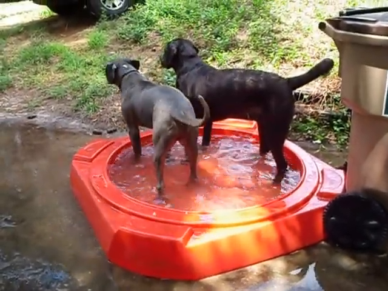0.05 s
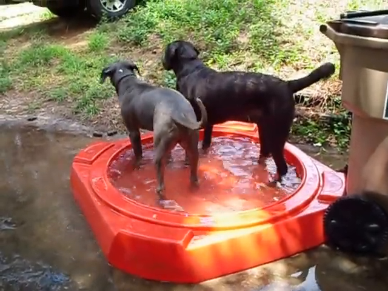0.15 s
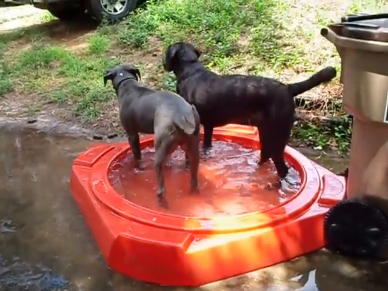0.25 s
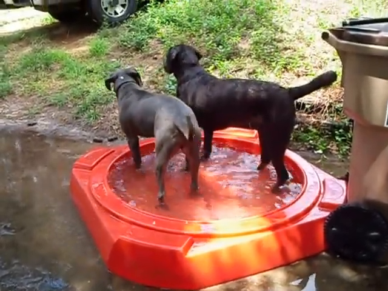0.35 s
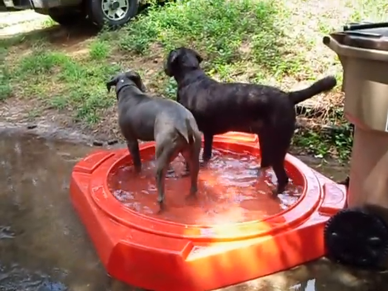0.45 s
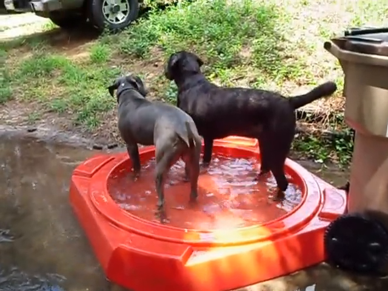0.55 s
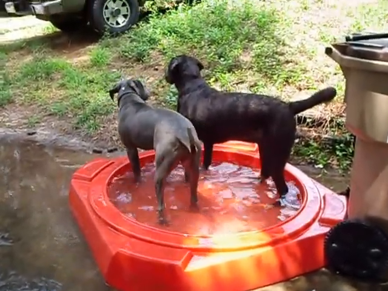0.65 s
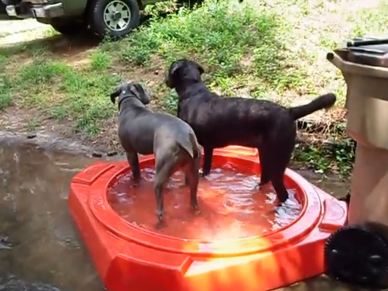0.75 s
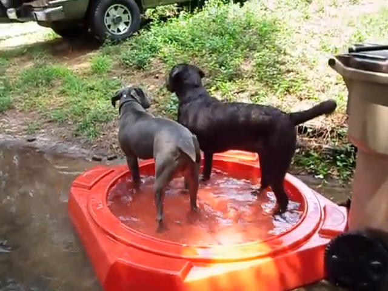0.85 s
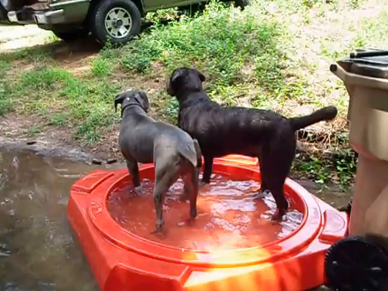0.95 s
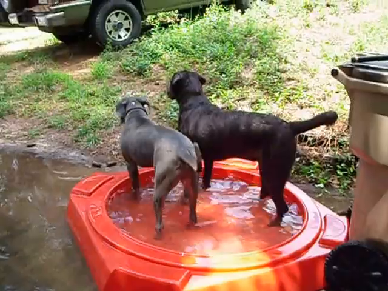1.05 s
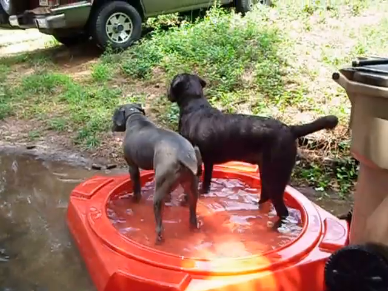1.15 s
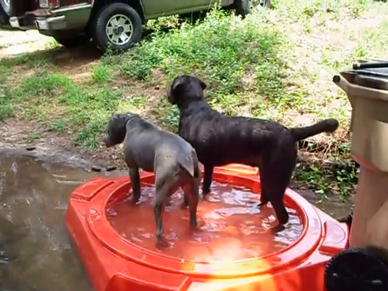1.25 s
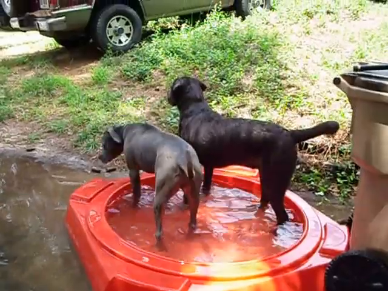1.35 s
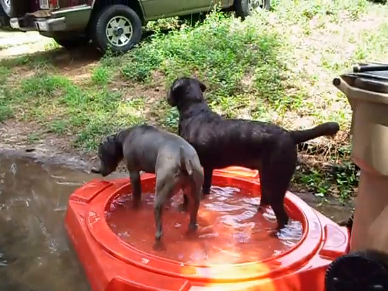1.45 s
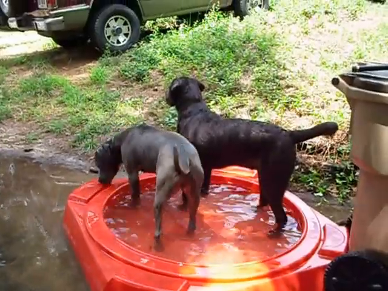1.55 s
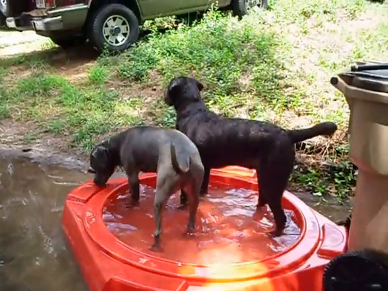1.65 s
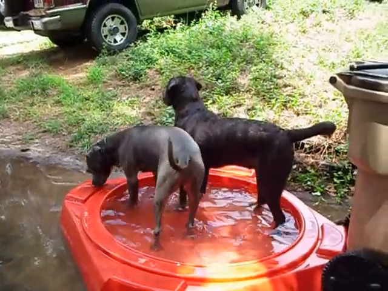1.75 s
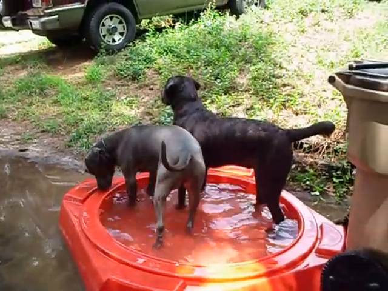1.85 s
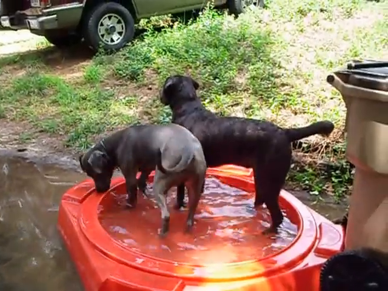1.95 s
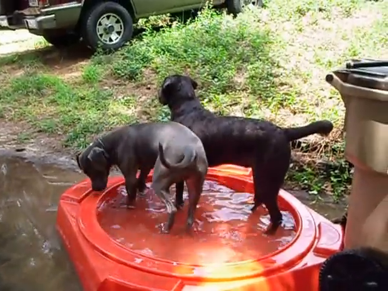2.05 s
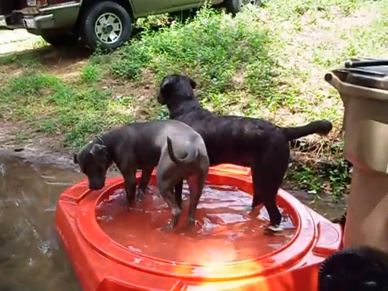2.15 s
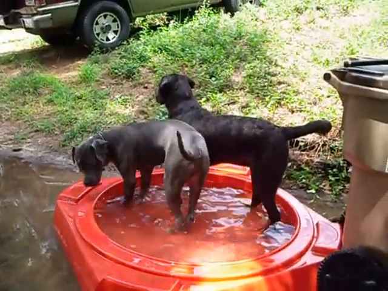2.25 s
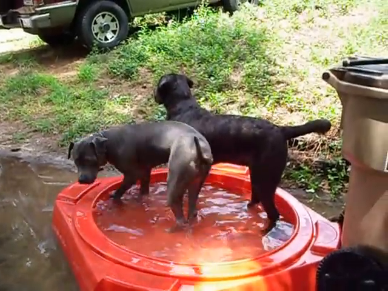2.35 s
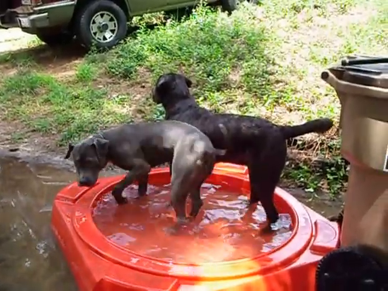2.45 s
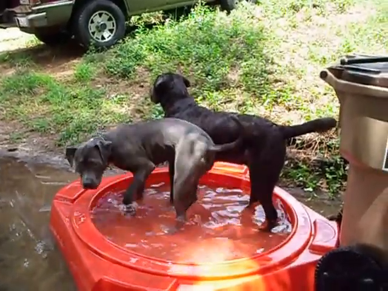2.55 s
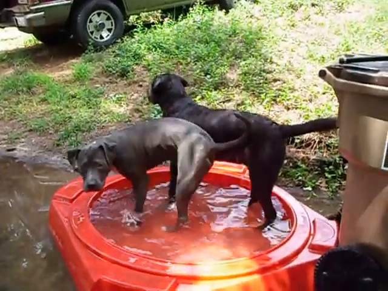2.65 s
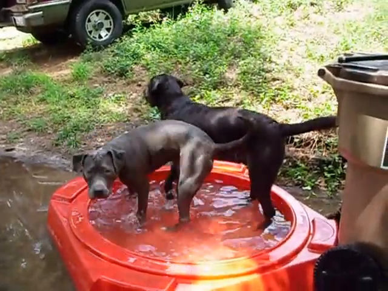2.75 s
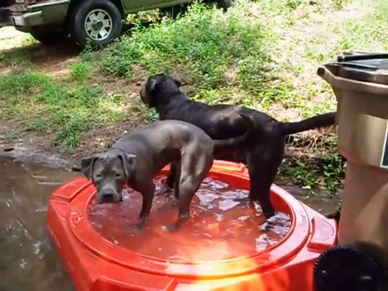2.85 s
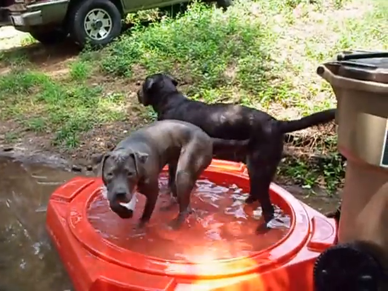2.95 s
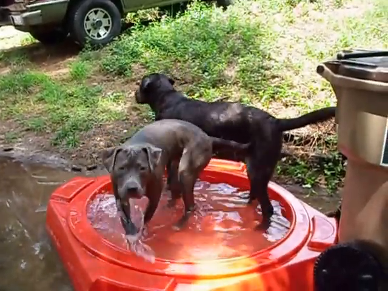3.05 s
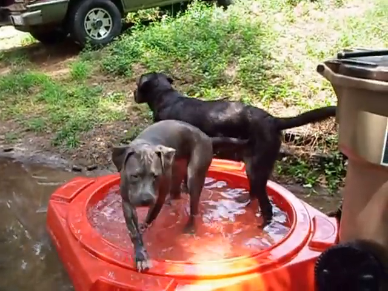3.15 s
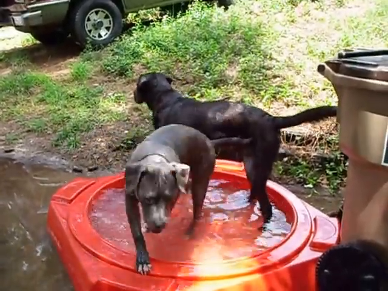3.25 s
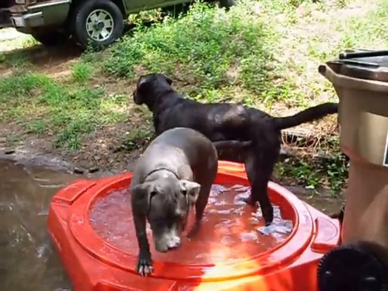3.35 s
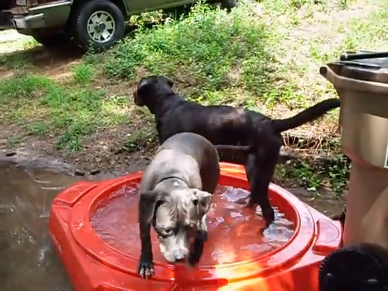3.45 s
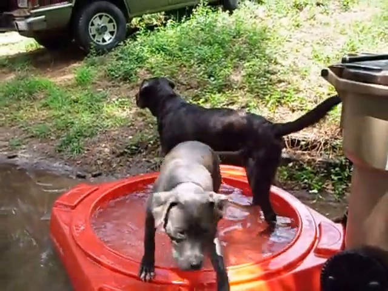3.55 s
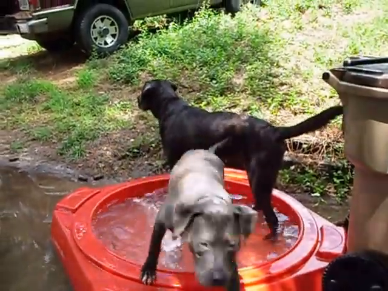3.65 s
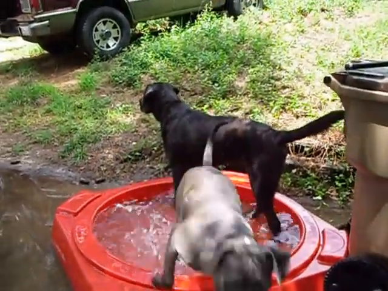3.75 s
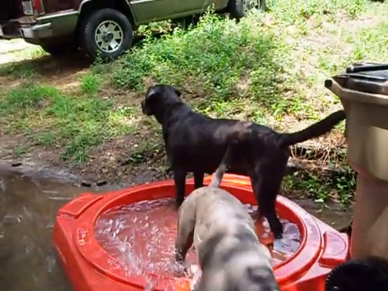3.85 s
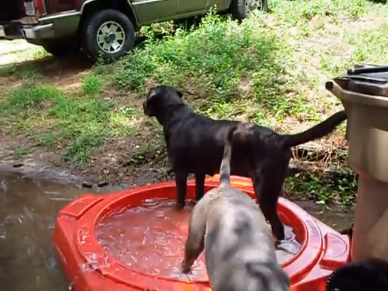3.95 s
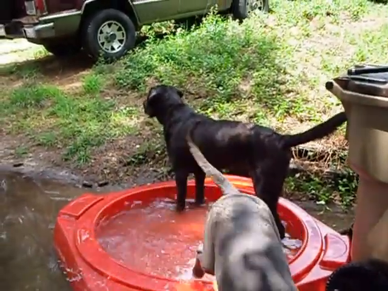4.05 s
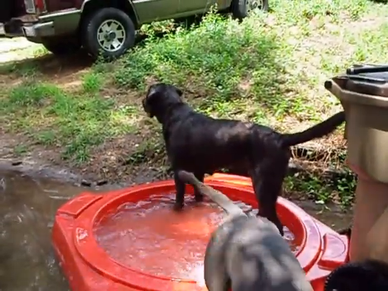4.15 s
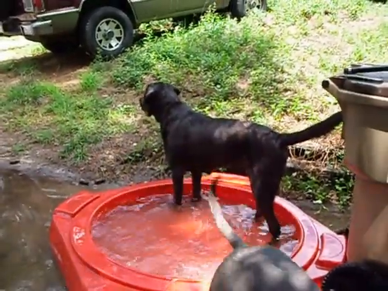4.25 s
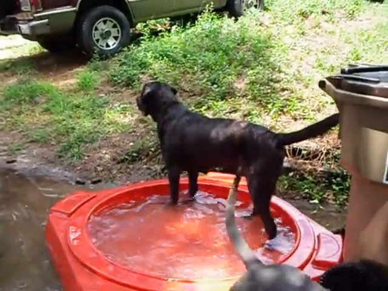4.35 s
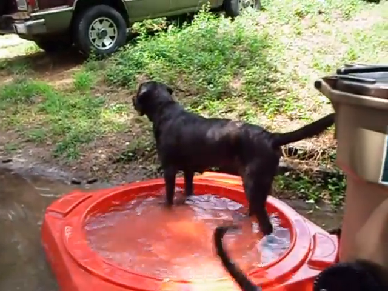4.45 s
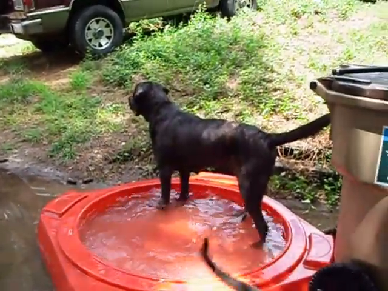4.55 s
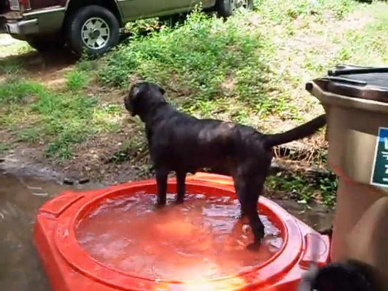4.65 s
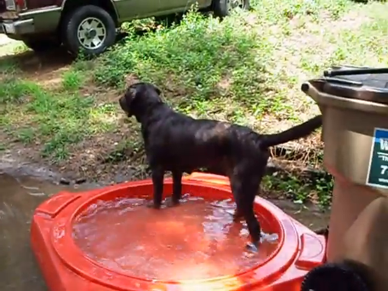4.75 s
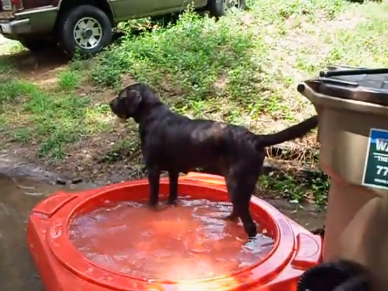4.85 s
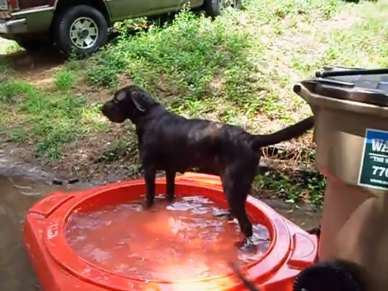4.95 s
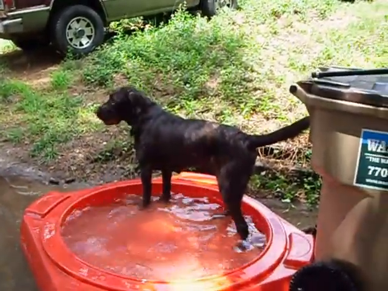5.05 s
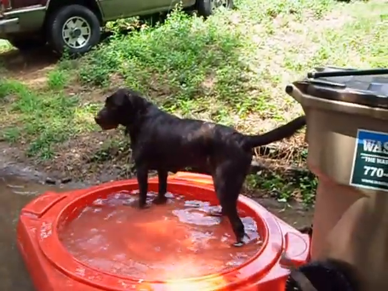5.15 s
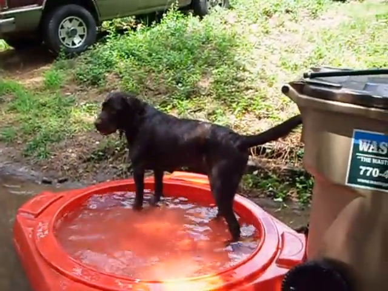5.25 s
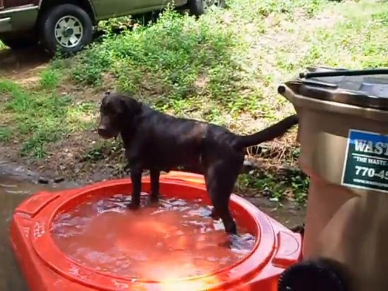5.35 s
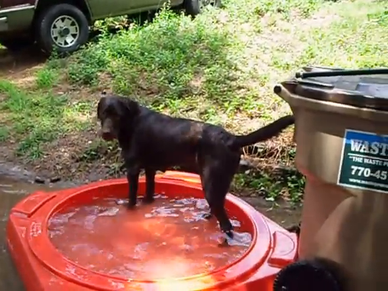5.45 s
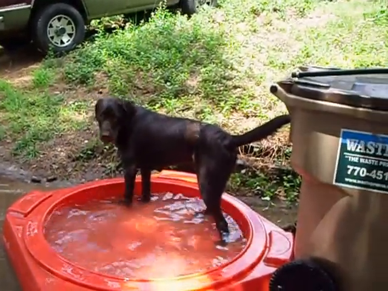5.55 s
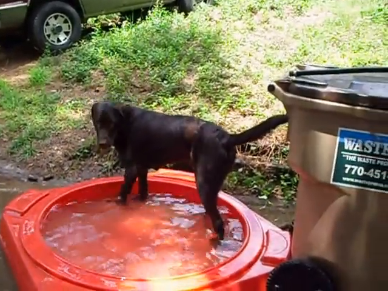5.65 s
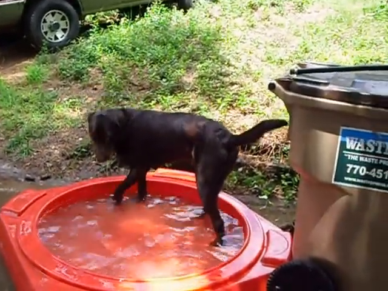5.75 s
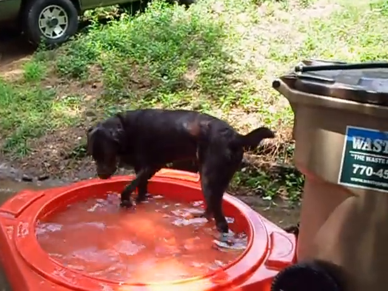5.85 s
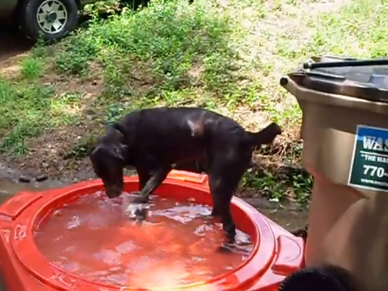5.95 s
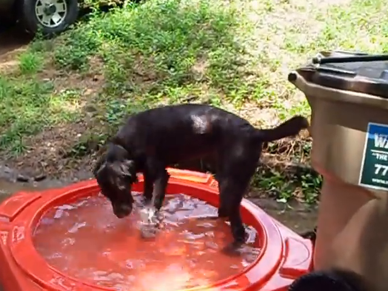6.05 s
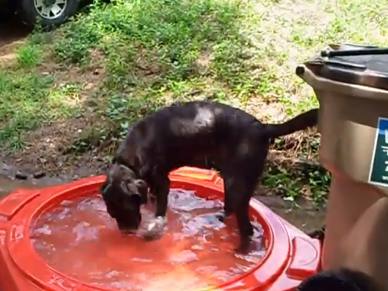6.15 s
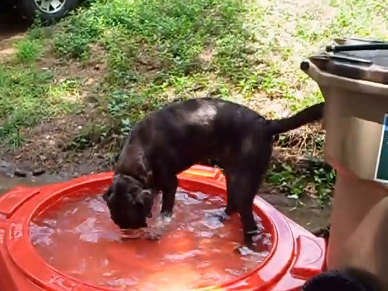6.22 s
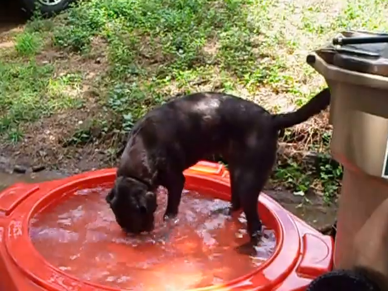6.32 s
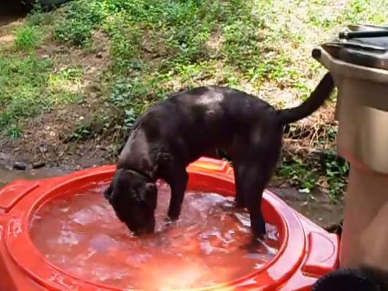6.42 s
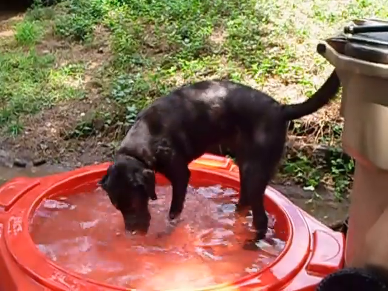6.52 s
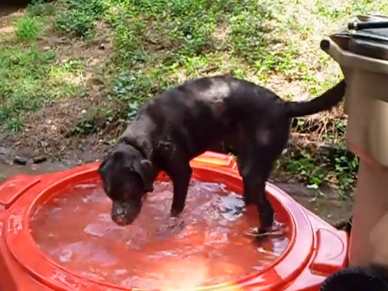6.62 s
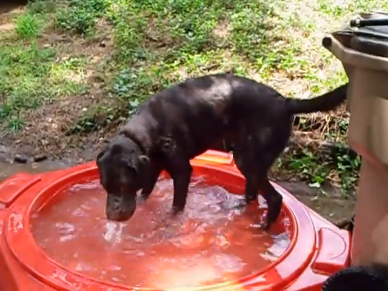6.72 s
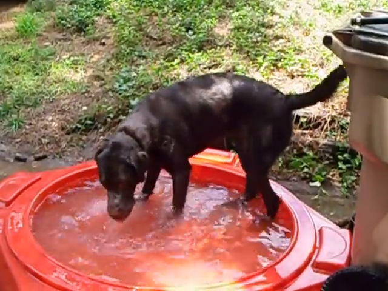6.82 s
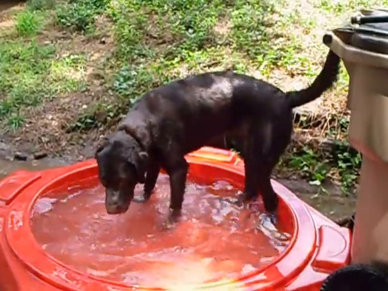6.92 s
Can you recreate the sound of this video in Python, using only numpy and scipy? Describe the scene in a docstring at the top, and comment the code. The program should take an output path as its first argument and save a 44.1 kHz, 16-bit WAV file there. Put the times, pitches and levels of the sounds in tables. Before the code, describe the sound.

Low outdoor rumble, soft microphone hiss and a faint, thin electric whine run throughout, the whine's high tones slowly fading in and out. The first two seconds are nearly only this, with a few tiny drips. From about 2.2 s paws move in shallow water: rounded plops, gurgles and fine spray. Near 3.2 s a paw knocks the hollow plastic rim with a deep, short double thump. Splashing is busiest from 3.5 to 4.5 s, with crisp crackling bursts and bright drops, a stronger splash near 3.8 s. It then thins to light trickling. From 5.3 to 6.1 s a dog shakes its head: loud, wet, leathery ear slaps about ten per second, with a dull low drone swelling beneath. Sloshing and plops resume around 6.0 to 6.2 s, then scattered gurgles and small drips continue to the end at 7 s. Close, with short, sparse yard echoes.

```python
"""Low rumble, microphone hiss and a faint drone come first, as shaped noise, with an electric whine: tones on
multiples of half the buzz pitch that fade in and out as the hand-held camera drifts.
Then two dogs wade in a shallow plastic pool in a yard: ringing bubbles, showers of small drops and bursts
of crackle, with sparse echoes. A paw thumps the hollow rim, heard as its damped tones.
Later the drone swells and one dog shakes its head: its ears slap as pulses, cracks and ringing air."""
import sys
import numpy as np
from scipy import signal
from scipy.fft import rfft, irfft
from scipy.io import wavfile
from scipy.ndimage import uniform_filter1d

SR = 44100
rng = np.random.default_rng(int(sys.argv[2]) if len(sys.argv) > 2 else 0)


def to_wav(s):
    """Save 16-bit WAV."""
    ch = np.atleast_2d(s).T  # columns
    pcm = np.round(np.clip(ch, -1, 1) * 32767)  # PCM
    wavfile.write(sys.argv[1], SR, pcm.astype(np.int16))


N = 307818


def amp(db):
    """Turns decibels into a linear gain."""
    return 10 ** (np.asarray(db) / 20)


def evened(x):
    """Brings a sound to an rms of one."""
    return x / np.sqrt(np.mean(x ** 2) + 1e-20)


def read(points, hz):
    """Reads a (Hz, value) table along a logarithmic frequency axis."""
    f, value = np.transpose(points)
    return np.interp(np.log(hz + 1), np.log(f + 1), value)


def curve(rows, t):
    """Reads a (seconds, value) table with straight lines between the rows."""
    s, value = np.transpose(rows)
    return np.interp(t, s, value)


def add(mix, s, sound):
    """Mixes a sound in from second s on, cutting it at the end of the mix."""
    part = mix[round(s * SR):][:len(sound)]
    part += sound[:len(part)]


def low_pass(x, hz):
    """Cuts the treble steeply above hz, without delay."""
    return signal.oaconvolve(x, signal.firwin(511, hz, window=("kaiser", 9), fs=SR), "same")


def coloured(noise, colour_db):
    """Shapes noise with a spectrum in dB and evens its level."""
    return evened(irfft(rfft(noise) * amp(colour_db)))


def air():
    """Rumble and hiss: random short-time spectra whose lowest part swells."""
    # spectrum of rumble and hiss, before levelling: f/Hz, density/dB per Hz
    air_colour = [(20, -0.5), (45, 2.5), (80, -2), (130, -6), (300, -11.5), (660, -20), (1200, -23.5),
                  (1500, -29), (2300, -32.5), (3500, -36.5), (5000, -37.5), (8500, -37.5), (12000, -37),
                  (15500, -35)]
    # swells of the rumble: t/s, gain/dB
    rumble_swell = [(0, -1.5), (.7, -3), (2.8, -2), (4.3, -1.5), (5.0, -1), (5.7, .5), (6.2, -1),
                    (6.98, -1.2)]
    level_db, hop = -45.5, 512
    frames, hz = N // hop + 5, np.fft.rfftfreq(2048, 1 / SR)
    real, imaginary = rng.standard_normal((frames, 1025, 2)).T
    low_share = 1 / (1 + (hz[:, None] / 780.0) ** 2)
    swell_db = low_share * curve(rumble_swell, np.arange(frames) * hop / SR)
    spectra = (real + 1j * imaginary) * amp(read(air_colour, hz)[:, None] + swell_db)
    noise = signal.istft(spectra, nperseg=2048, noverlap=2048 - hop)[1][:N]
    return amp(level_db) * evened(noise)


def drone():
    """A dull low drone: noise in one narrow band that swells and fades."""
    # t/s, rms level/dB
    drone_level = [(5.2, -68), (5.6, -46.5), (6.15, -44.5), (6.35, -60), (6.98, -53)]
    centre_hz, width_hz = 72, 15
    hz = np.fft.rfftfreq(N, 1 / SR)
    band = np.exp(-((hz - centre_hz) / width_hz) ** 2)
    noise = irfft(rfft(rng.standard_normal(N)) * band, N)
    return amp(curve(drone_level, np.arange(N) / SR)) * evened(noise)


def whine():
    """Steady tones fade as camera drift shifts the phases of their paths; four leads follow level curves."""
    # levels of the tones that lead in turn, by multiple of the buzz pitch: t/s, rms level/dB
    leads = {34: [(0, -60), (.9, -63), (1.3, -59), (2.3, -65), (3.0, -64.5), (4.15, -54.5), (4.95, -71),
                  (5.75, -56.5), (6.98, -63)], 35: [(0, -53.5), (1.5, -61.5), (2.9, -54.5), (3.4, -58), (3.8, -59),
                                       (4.15, -68), (4.6, -58), (5.05, -63), (5.4, -82), (6.0, -77),
                                       (6.5, -62), (6.98, -69)], 60: [(0, -59.5), (.8, -63), (1.35, -55),
                                                            (3.0, -57.5), (3.75, -70), (4.2, -58),
                                                            (5.3, -60.5), (5.75, -71), (6.3, -58),
                                                            (6.98, -63)], 92: [(0, -68), (1.75, -65),
                                                                                 (2.6, -72), (3.3, -57),
                                                                                 (4.15, -54.5), (4.6, -63),
                                                                                 (5.1, -58), (5.75, -69),
                                                                                 (6.2, -59), (6.98, -59)]}
    # other multiples that stand out: multiple of the buzz pitch, mean rms level/dB
    clear_tones = [(10, -70), (24, -75), (25, -76), (29, -75), (32, -67), (36, -69), (37, -67), (40, -74),
                   (46, -71), (53, -70), (54, -71), (56, -74), (57, -72), (58, -65), (59, -72), (61, -63),
                   (62, -68.5), (63, -71), (64, -71), (65, -70), (66, -73), (67, -71), (68, -69), (79, -74),
                   (78, -74), (80, -66.5), (81, -74), (84, -74), (85, -71), (86, -70), (88, -71), (89, -73),
                   (90, -73), (91, -66), (93, -66), (94, -70), (95, -66), (96, -63.5), (97, -65.5),
                   (98, -72), (100, -73), (101, -72), (102, -73), (107, -73), (109, -70), (119, -72),
                   (125, -73)]
    # the remaining whole multiples, before scatter: f/Hz, rms level/dB
    faint_tones = [(1200, -89), (3000, -85), (5000, -79), (9000, -85.5), (12500, -78.5), (15800, -77.5)]
    # weaker tones halfway between the multiples, before scatter: f/Hz, rms level/dB
    halfway_tones = [(1200, -87), (3000, -84.5), (4200, -84), (5500, -85.5), (7200, -79.5), (9000, -85),
                     (11200, -73), (12500, -77.5), (15800, -86)]
    # drift of the hand-held camera: t/s, position/mm
    camera_drift = [(0, -1), (.5, 14), (1.4, 46), (2.9, 67), (4.3, 36), (4.9, 63), (5.8, 109.5),
                    (6.98, 123)]
    buzz_hz, scatter_db = 120, 2  # scatter: how unevenly the unlisted tones stand
    path_count, reflected_db, sound_mm_per_s = 5, -6, 343000
    period = 2 * SR // buzz_hz  # samples in one mains cycle, two buzz cycles
    slow_t = np.arange(N // period + 2) * period / SR
    delay = curve(camera_drift, slow_t) / sound_mm_per_s
    clear = dict(clear_tones)
    multiples, fields = np.arange(10, 132, .5), []
    for k in multiples:
        hz = k * buzz_hz
        start, slant = rng.random((2, path_count, 1))
        paths = np.exp(2j * np.pi * (start + hz * delay * np.cos(np.pi * slant)))
        plain_db = read(halfway_tones if k % 1 else faint_tones, hz)
        plain_db += scatter_db * rng.standard_normal()
        if k in leads:
            fields.append(amp(curve(leads[k], slow_t)) * paths[0])
        else:
            field = paths[0] + amp(reflected_db) * paths[1:].sum(axis=0)
            field /= np.sqrt(np.mean(abs(field) ** 2))
            fields.append(amp(clear.get(k, plain_db)) * field)
    share = np.arange(period) / period
    waves = np.exp(4j * np.pi * multiples[:, None] * share)
    cycles = np.sqrt(2) * (np.transpose(fields) @ waves).real
    # crossfade each mains cycle into the next
    return (cycles[:-1] * (1 - share) + cycles[1:] * share).ravel()[:N]


def bubble(hz, ms, glide, wobble=0.):
    """A pocket of air rings: sudden start, slower fall, pitch sliding as it nears the surface."""
    u = np.arange(0, 4 * ms / 1000, 1 / SR) * 1000 / ms  # time in bubble lengths
    shake = wobble * evened(uniform_filter1d(rng.standard_normal(len(u)), size=round(SR / hz)))
    pitch = hz * (1 + glide * (np.minimum(u, 1.6) - .5) + shake)
    turns = np.cumsum(pitch) / SR
    shape = (1 - np.exp(-u / 0.38)) * np.exp(-1.5 * u)
    return shape / shape.max() * np.sin(2 * np.pi * turns)


def bubbles():
    """The clear gurgles of paws going in and out; moving water shakes their pitch."""
    # loudest moment t/s, level/dB, pitch f/Hz, length/ms, glide/share of the pitch per length
    bubble_rows = [(1.275, -54, 3550, 21, -0.027), (1.77, -54, 1740, 6, 0), (2.0, -54, 1710, 6, 0),
                   (2.222, -51, 1760, 11, 0.065), (2.232, -44.5, 1200, 7, -.1),
                   (2.533, -36, 1120, 8.1, -0.105), (2.549, -45, 640, 10.6, 0), (2.56, -46, 1400, 9, .1),
                   (2.691, -42, 496, 5.6, 0.28), (2.791, -33.5, 850, 5.5, 0.26),
                   (2.815, -46.5, 764, 15, -0.18), (2.815, -39, 1190, 5.2, .1),
                   (2.826, -40, 1415, 11, 0.13), (2.905, -37, 1110, 4, 0.032), (2.921, -39, 770, 9, -0.16),
                   (2.937, -46, 2080, 8, .03), (2.956, -35.5, 1006, 5.6, -0.032),
                   (3.251, -39.5, 2660, 4, 0.23), (3.252, -40, 1040, 3.5, -.2), (3.361, -41, 1400, 7, .03),
                   (3.432, -34, 1000, 3.1, .05), (3.433, -41.5, 1480, 4.8, -0.075),
                   (3.578, -40, 960, 5.2, -.1), (3.627, -43, 900, 8.7, 0.19), (3.655, -32, 2700, 2, .2),
                   (3.705, -46, 1400, 4.8, 0.083), (3.709, -37.5, 660, 4.9, -.18),
                   (3.742, -43, 3250, 3.6, 0.14), (3.790, -41, 2140, 6, .05),
                   (3.797, -39, 950, 8.7, -0.024), (3.825, -36, 766, 12.6, 0.049),
                   (3.832, -46, 2500, 12, 0.063), (3.879, -38, 984, 5.9, 0.18),
                   (3.993, -43, 710, 12, -0.029), (4.059, -45, 1170, 11, 0.26), (4.072, -37, 2960, 1.8, 0),
                   (4.121, -33.5, 2750, 1.6, 0), (4.121, -36, 5070, 3, .16), (4.129, -44, 3400, 10, 0),
                   (4.142, -39.5, 897, 17, .45), (4.183, -45, 1055, 7, -0.016),
                   (4.481, -42, 4160, 13.4, -0.077), (4.49, -33, 3060, 1.6, 0), (4.498, -39, 3370, 3, .1),
                   (6.099, -43, 776, 9, .2), (6.156, -40, 1036, 8.7, 0.07), (6.16, -34, 404, 11.6, 0.025),
                   (6.172, -36.5, 995, 16, -.3), (6.201, -37, 1300, 6, -0.033),
                   (6.211, -35.5, 788, 9.3, 0.02), (6.362, -43, 2600, 2.2, 0),
                   (6.381, -47, 3080, 2.9, -0.031), (6.453, -45, 2650, 3, -.18),
                   (6.601, -42.5, 1100, 6.1, 0.01), (6.631, -37.5, 1060, 5.8, 0),
                   (6.648, -37, 737, 9.1, -0.013), (6.65, -41, 1240, 4.2, 0.025),
                   (6.71, -43.5, 992, 19, 0.31), (6.811, -45, 2900, 2.6, 0), (6.85, -48, 2700, 3, 0),
                   (6.875, -49, 2650, 3, -0.038), (6.917, -40.5, 3000, 1.9, -0.0072),
                   (6.976, -38, 1040, 5, -0.048)]
    out = np.zeros(N)
    for s, db, hz, ms, glide in bubble_rows:
        add(out, s - .4 * ms / 1000, amp(db) * bubble(hz, ms, glide, wobble=.05))
    return out


def yard(x):
    """Sparse reflections of random sign, each band dying at its own speed."""
    # decay of the echoes: f/Hz, t60/s
    yard_decay = [(300, 0.071), (1200, 0.17), (2500, 0.11), (6000, 0.22), (14000, 0.05)]
    taps = np.zeros(SR // 2)
    at = np.arange(260, SR // 2 - 20, 20)
    taps[at + rng.integers(0, 20, len(at))] = rng.choice([-1., 1.], len(at))
    hz, t, spectra = signal.stft(taps, SR, nperseg=256)
    decay = amp(-60 * t / read(yard_decay, hz)[:, None])
    tail = signal.istft(spectra * decay, SR, nperseg=256)[1]
    return signal.oaconvolve(x, tail / np.linalg.norm(tail))[:N]


def drops(per_s, low_hz, high_hz, cycles, spread_db, count=24):
    """Random small bubbles at many pitches; a few are much louder."""
    out = np.zeros(N)
    for hz in np.geomspace(low_hz, high_hz, count):
        chance, size = rng.random(N), rng.exponential(1, N)
        train = (chance < per_s / count / SR) * amp(spread_db * np.minimum(size, 4))
        out += signal.oaconvolve(train, bubble(hz, 1000 * cycles / hz, 0.11))[:N]
    return evened(out)


def spray():
    """Fizz and mist follow the fine drops; crowds of short gurgles make the sloshing."""
    # fine drops over stirred water, before the layer gains: t/s, level/dB
    spray_level = [(2.1, -76), (2.5, -65), (2.6, -61), (3.0, -59.5), (3.3, -61), (3.5, -57.5), (3.9, -56.5),
                   (4.05, -58), (4.4, -62), (4.55, -80.5), (4.8, -55.5), (4.95, -65), (5.4, -60.5),
                   (6.0, -54), (6.55, -65), (6.97, -55)]
    # a leg drags through the water, before the layer gain: strongest moment t/s, level/dB
    slosh_rows = [(2.55, -50.5), (2.7, -55), (2.94, -44.5), (3.2, -52), (3.65, -45.5), (3.839, -44),
                  (4.05, -48), (4.2, -55), (4.8, -59), (5.72, -56), (6.0, -51), (6.19, -45), (6.4, -55),
                  (6.66, -50), (6.97, -50)]
    rise_db_per_s, fall_db_per_s, lapping_db = 188, 129, -61  # lapping: the floor between sloshes
    fine_per_s, gurgles_per_s = 1300, 500
    t = np.arange(N) / SR
    slosh_db = np.full(N, float(lapping_db))
    for s, db in slosh_rows:
        distance_db = np.maximum(rise_db_per_s * (s - t), fall_db_per_s * (t - s))
        slosh_db = np.maximum(slosh_db, db - distance_db)
    stirred = t > spray_level[0][0]  # silent before the first row
    fine = amp(curve(spray_level, t)) * stirred
    slosh = amp(slosh_db) * stirred
    fizz = drops(fine_per_s, 1970.0, 3880.0, cycles=2.6, spread_db=5.0)
    mist = drops(4 * fine_per_s, 5070.0, 15200.0, cycles=7.2, spread_db=4.0)
    gurgles = drops(gurgles_per_s, 601.0, 1550.0, cycles=3.3, spread_db=3.0)
    return fine * (amp(-3.0) * fizz + amp(-3.5) * mist) + slosh * amp(-1.5) * gurgles


def splats():
    """Water slaps water: a burst of clumped crackle that starts quickly and dies fast."""
    # start t/s, level/dB, treble tilt/dB per octave
    splat_rows = [(2.226, -51, -4), (2.677, -44.5, -5), (2.75, -46, -5), (2.949, -55, -8), (3.11, -46.5, 3),
                  (3.16, -42.5, -1), (3.176, -41, 1.5), (3.248, -47, 3), (3.335, -47, 3),
                  (3.537, -45.5, -5), (3.568, -46, -5), (3.604, -47.5, -6), (3.654, -45, -4),
                  (3.707, -44, -3.5), (3.738, -43, 0.5), (3.783, -34.5, -2), (3.797, -46, 1),
                  (3.834, -38, -4), (3.943, -42, -0.5), (3.982, -43.5, 3), (4.02, -41.5, -3.5),
                  (4.07, -40, 0), (4.099, -38.5, -2.5), (4.12, -42, 1), (4.163, -41.5, 2), (4.25, -45, -3),
                  (4.36, -48, -1), (4.411, -45.5, 3), (4.457, -44, -1), (4.478, -45, -2.5),
                  (4.488, -43.5, 0), (4.703, -49, -6), (5.821, -43, -4), (5.838, -43, 0), (6.029, -50, -2),
                  (6.171, -42.5, -2.5), (6.199, -42.5, -4), (6.361, -52, -7), (6.449, -48, -3),
                  (6.49, -48, -3), (6.698, -47.5, 0)]
    # shared spectrum before the tilt: f/Hz, density/dB per Hz
    splat_colour = [(600, -9), (1500, -13), (2600, 1.5), (4000, -1), (6000, -2), (9000, -3), (13000, -1.5),
                    (15500, -3)]
    out, hz, t = np.zeros(N), np.fft.rfftfreq(4096, 1 / SR), np.arange(4096) / SR
    rise = np.minimum(t / .005, 1)
    shape = rise * (amp(-60 * t / 0.059) + amp(-10.5 - 60 * t / 0.46))  # a fast and a slow decay
    for s, db, tilt_db in splat_rows:
        noise, clumps = rng.standard_normal((2, 4096))
        colour = amp(read(splat_colour, hz) + tilt_db * np.log2(hz / 5000 + 0.018))
        colour /= np.sqrt(np.mean(colour[400:640] ** 2))  # equal level around 4.3 to 6.9 kHz
        clumps = evened(uniform_filter1d(clumps, size=40))
        clumps = amp(5.7 * np.minimum(clumps, 1.6))
        add(out, s, amp(db) * shape * clumps * irfft(rfft(noise) * colour))
    return out


def thump():
    """A paw lands in two stages on the hollow rim, which flexes down and then springs back."""
    # tones of the hollow plastic rim, before levelling: f/Hz, level/dB, t60/s
    rim_tones = [(50.3, -7.5, 0.28), (77, 6, 0.27), (125.3, -7.5, 0.32), (232.5, -6, 0.22),
                 (282, -10, 0.23)]
    # the two stages: t/s, level/dB
    landings = [(3.176, -22), (3.189, -19)]
    out, t = np.zeros(N), np.arange(SR // 3) / SR
    ring = sum(amp(db - 60 * t / t60) * np.sin(2 * np.pi * hz * t) for hz, db, t60 in rim_tones)
    rise = np.minimum(t / 0.0026, 1)
    for way, (s, db) in zip((1, -1), landings):
        add(out, s, way * amp(db) * ring / abs(ring).max() * rise)
    return out


def flaps():
    """Each slap is a pressure pulse with a crack, twice rebounding, ringing trapped air and a wet rustle."""
    # ears and lips slapping: peak of the blow t/s, level/dB, trapped-air pitch f/Hz; relative to that level:
    # ring/dB, upper ring/dB, crack/dB; first rebound delay/ms, first rebound level/dB
    flap_rows = [(5.279, -37, 597, -2, -6, -1.5, 1.9, -9), (5.3697, -19.5, 970, -2.5, 3.5, -9, 2.3, -23),
                 (5.390, -31.5, 950, -22, -4, -2.5, 2.1, -12),
                 (5.4606, -14, 1160, -10, -1, -12.5, 2.36, 0.1),
                 (5.556, -19.5, 850, -4.5, -16, -18, 2.4, 3.5),
                 (5.654, -15, 914, -5.5, -15, -5.5, 2.5, -1.5), (5.700, -35, 950, -20, 1, -3, 2.5, -7),
                 (5.757, -15.5, 996, -1.5, -19, -20.5, 2.2, 7.5),
                 (5.852, -13, 1115, -0.5, -11, -11, 2.4, -5), (5.9506, -21, 1060, 2, -11, -12.5, 2.23, 4),
                 (6.0512, -18, 860, -7.5, -1, -15.5, 3.7, 1.5), (6.088, -47, 750, -15, -20, 3, 2.2, 0)]
    # spectrum of the crack, before the treble lift and levelling: f/Hz, density/dB per Hz
    crack_colour = [(300, -4), (1100, 13), (1550, -5), (2400, 9), (3800, 3.5), (6200, 2), (7800, -7),
                    (10700, -8), (12200, -3.5), (15500, -2), (16800, -43)]
    upper_ring_hz, hollow_hz = 2240, 1470  # the second air mode, and a dip in the pulse below it
    second_ms, second_db = 4.9, -2.5  # second rebound: delay from the blow, level against the first
    lead_s = .0008  # from the start to the peak of the blow
    out, t, f = np.zeros(N), np.arange(2048) / SR, np.fft.rfftfreq(2048, 1 / SR)
    lag = t - lead_s
    u, rise = lag / .00016, np.minimum(t / lead_s, 1) ** 2
    # the dull weight of the ear
    push = amp(-9.5 - 60 * t / 0.0099) * np.cos(2 * np.pi * 570.0 * lag) * rise
    pulse = (1 - u ** 2) * np.exp(-u ** 2 / 2)
    pulse = signal.lfilter(*signal.iirnotch(hollow_hz, 3., SR), pulse)
    colour_db = read(crack_colour, f) + 3.5 * (f > 9000)  # treble lift
    for s, db, hz, ring_db, upper_db, crack_db, first_ms, first_db in flap_rows:
        noises = [coloured(noise, colour_db) for noise in rng.standard_normal((4, 2048))]
        ring = amp(ring_db - 60 * t / 0.02) * np.cos(2 * np.pi * hz * lag) * rise
        upper = amp(upper_db - 60 * t / 0.0075) * np.cos(2 * np.pi * upper_ring_hz * lag) * rise
        rustle_shape = amp(-6.0 + .5 * crack_db - 60 * t / 0.049) * np.minimum(t / 0.0089, 1)
        rustle = rustle_shape * noises[3]
        # a rebound louder than the blow lifts the rustle
        body = amp(db) * (ring + push) + amp(db + max(0, first_db)) * rustle
        add(out, s - lead_s, body)
        # delay/ms, level/dB, brightness/dB: later contacts have more crack and less pulse
        blows = ((0, 0, 0), (first_ms, first_db, 2.5), (second_ms, first_db + second_db, 5.))
        for (ms, blow_db, bright_db), noise in zip(blows, noises):
            crack = amp(crack_db + bright_db) * noise * np.exp(-u ** 2 / 26.0)
            contact = amp(-bright_db) * (.6 * pulse + upper) + crack
            add(out, s - lead_s + ms / 1000, amp(db + blow_db) * contact)
    return out


def scene():
    """Mixes all layers; only the direct ear slaps reach above the soft limit."""
    water, ears = bubbles() + splats() + spray(), flaps()
    echoes = yard(amp(-13.5) * water + amp(-19.5) * ears)
    soft = low_pass(air() + drone() + whine() + water + thump() + echoes, 15800)
    return (soft + ears)[None]


def record(dry):
    """The band limit: a steep cut at 16.8 kHz."""
    return low_pass(dry[0], 16800)[None]


dry = scene()
out = record(dry)
to_wav(out)
```